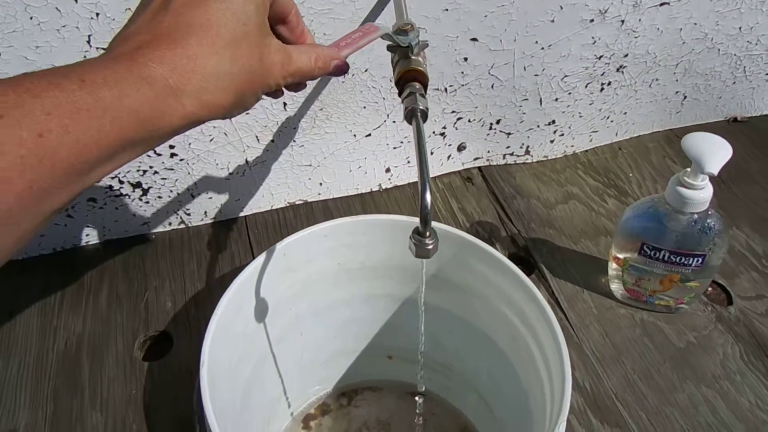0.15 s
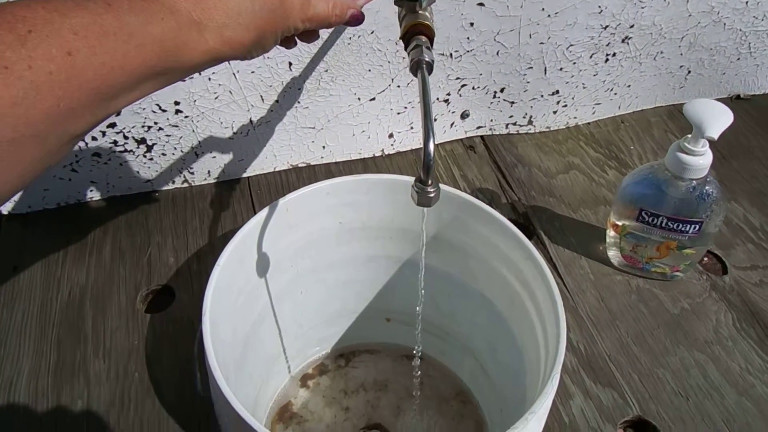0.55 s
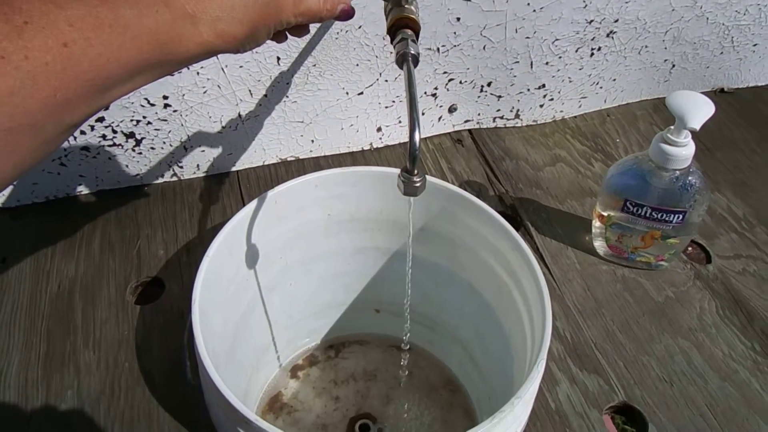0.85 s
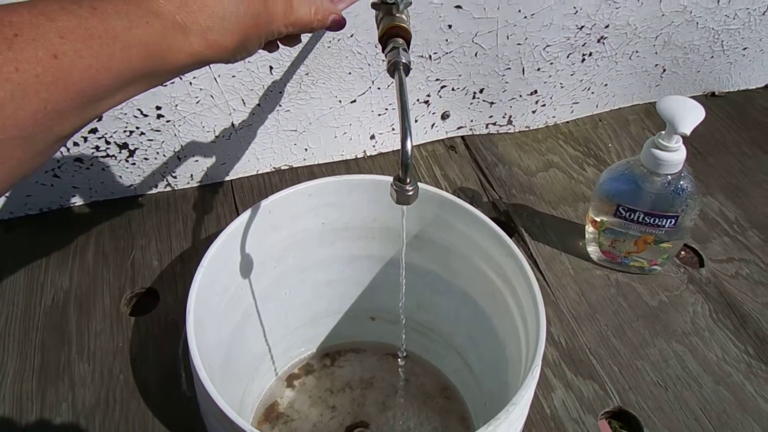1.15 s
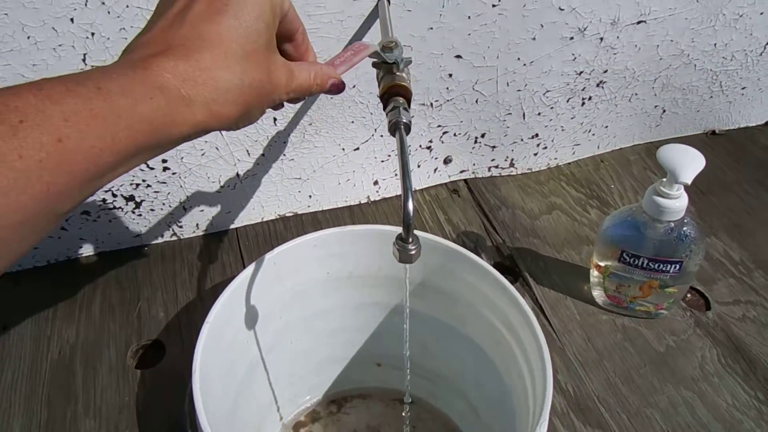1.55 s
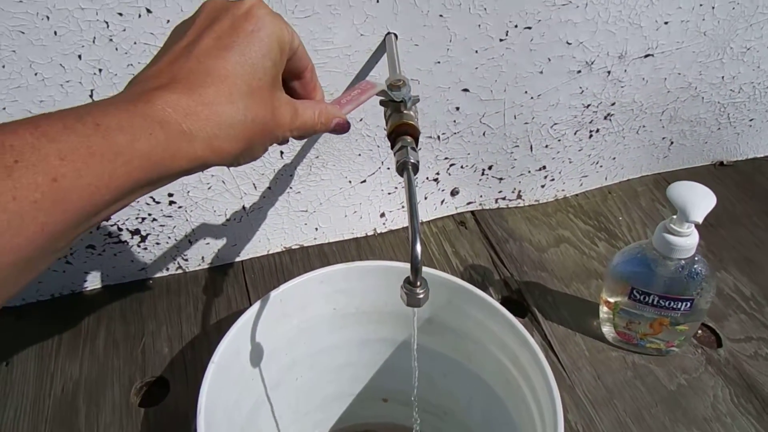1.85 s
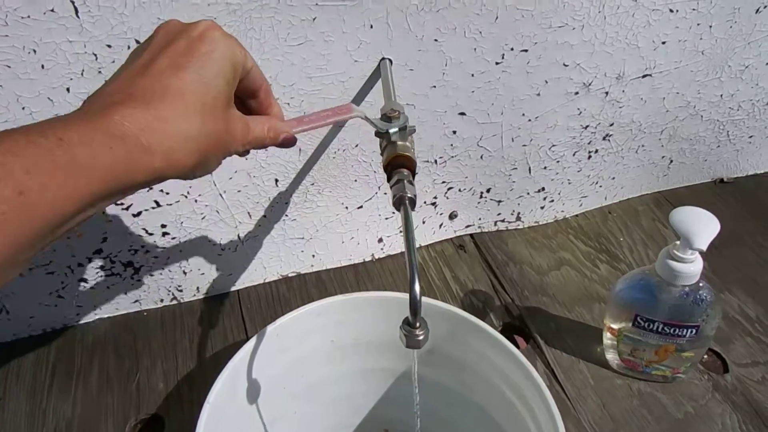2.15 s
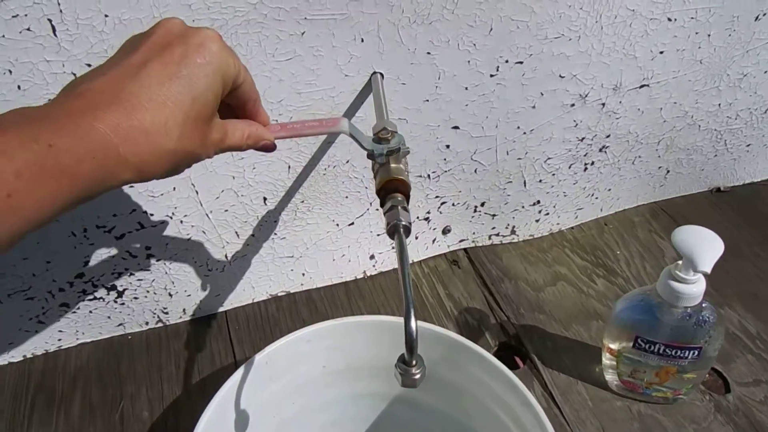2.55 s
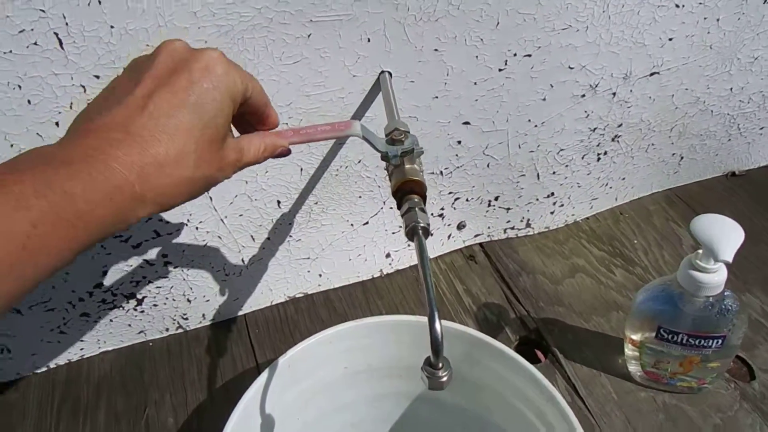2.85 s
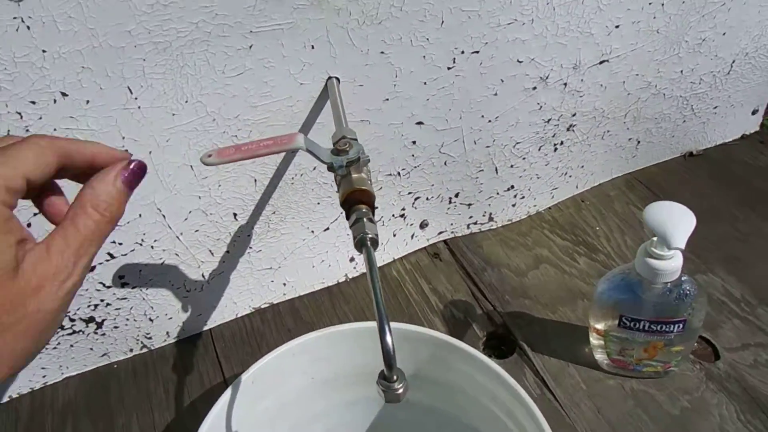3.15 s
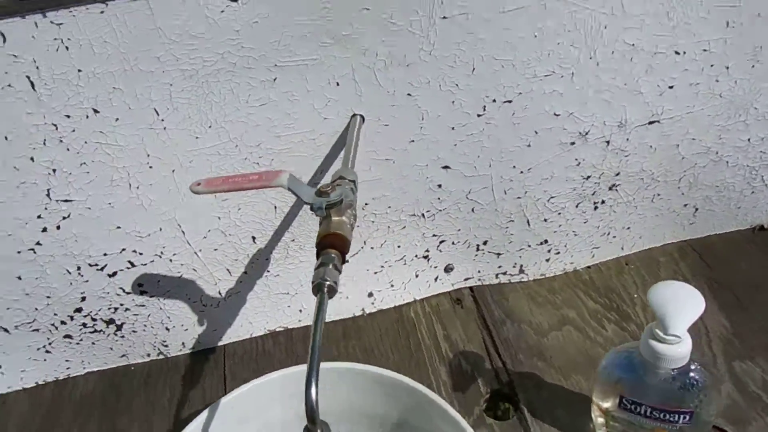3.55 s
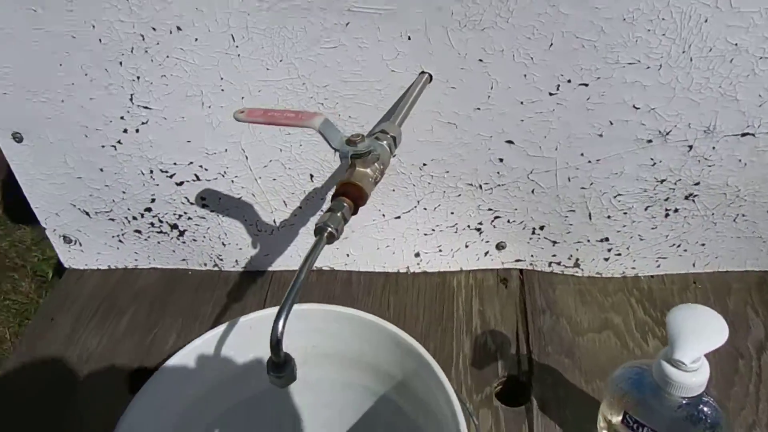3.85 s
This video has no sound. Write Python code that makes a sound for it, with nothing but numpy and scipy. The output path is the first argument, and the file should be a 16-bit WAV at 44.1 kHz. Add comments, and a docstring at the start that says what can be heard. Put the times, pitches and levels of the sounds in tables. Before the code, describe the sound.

Water trickles and plinks into a nearly empty bucket outdoors until it is shut off.

```python
"""Water patters and plinks as a thin stream falls from a spout into a nearly empty plastic bucket.
Drops slap the wet bottom, burst into spray and trap bubbles, which ring in the bucket's resonances.
The valve is shut and the last drops land at about 2.5 s.
Faint ticks and soft handling bumps remain over a steady wash of outdoor air."""
import sys
import numpy as np
from scipy import signal
from scipy.fft import rfft, irfft
from scipy.io import wavfile

SR = 44100
rng = np.random.default_rng(int(sys.argv[2]) if len(sys.argv) > 2 else 0)


def wrap_up_sound(samples):
    """Save the sound to the file named by the first command line argument, as 16-bit audio."""
    columns = np.atleast_2d(samples).T
    # keep every value between -1 and 1, then stretch to whole-number steps
    tamed = np.clip(columns, -1, 1)
    steps = np.round(tamed * 32767).astype(np.int16)
    wavfile.write(sys.argv[1], SR, steps)


N = 176400
T = np.arange(N) / SR
HZ = np.fft.rfftfreq(2 * N, 1 / SR)


def amp(db):
    """Decibels to gain."""
    return 10 ** (np.asarray(db) / 20)


def unit_rms(x):
    """Scales to unit rms."""
    return x / np.sqrt(np.mean(x ** 2) + 1e-20)


def curve(points):
    """Spreads (Hz, value) points over all frequencies."""
    hz, value = np.transpose(points)
    return np.interp(np.log(HZ + 1), np.log(hz), value)


def peaks(rows):
    """EQ curve in dB from (Hz, width, dB) peaks or dips."""
    return sum(db / (1 + (2 * (HZ - hz) / width) ** 2) for hz, width, db in rows)


def causal(db):
    """Response with this dB curve that rings only after it is struck."""
    log_gain = np.log(amp(np.r_[db, db[-2:0:-1]]))
    return np.exp(np.conj(signal.hilbert(log_gain))[:len(HZ)])


def filtered(x, response):
    """Filters by a frequency response."""
    return irfft(rfft(x, 2 * N) * response)[..., :N]


def add(mix, s, sound):
    """Mixes a sound in at time s."""
    part = mix[max(round(s * SR), 0):][:len(sound)]
    part += sound[:len(part)]


def wander(rate_hz):
    """Unit random drift up to a rate."""
    return unit_rms(filtered(rng.standard_normal(N), 1 / (1 + (HZ / rate_hz) ** 4)))


def fade(t, rise_s, t60_s):
    """Linear attack, exponential decay."""
    return np.minimum(t / rise_s, 1) * amp(-60 * np.maximum(t - rise_s, 0) / t60_s)


def rings(rows, rise_s, t60_s, glide_per_s=0):
    """Plays (s, dB, Hz) rows as dying tones; the glide is a fraction of the starting pitch."""
    t, out = T[:SR // 8], np.zeros(N)
    for s, db, hz in rows:
        tone = np.sin(2 * np.pi * hz * (t + glide_per_s * t ** 2 / 2))
        add(out, s, amp(db) * fade(t, rise_s, t60_s) * tone)
    return out


def bursts(rows, rise_s, t60_s, width_hz):
    """Plays (s, dB, Hz) rows as dying puffs of noise around each pitch."""
    envelope, out = fade(T[:SR // 8], rise_s, t60_s), np.zeros(N)
    for s, db, hz in rows:
        band = signal.iirpeak(hz, hz / width_hz, fs=SR)
        puff = envelope * signal.lfilter(*band, rng.standard_normal(len(envelope)))
        add(out, s, amp(db) / 2 * puff * np.linalg.norm(envelope) / np.linalg.norm(puff))
    return out


def stereo(direct, diffuse, likeness, balance, left_lead=0):
    """Direct sound in the middle, diffuse sound in the sides, panned by frequency."""
    alike, tilt = np.clip(curve(likeness), -1, 1), amp(curve(balance))
    mid = filtered(direct, np.sqrt(1 + alike))
    side = filtered(diffuse, np.sqrt(1 - alike))
    pan = np.array([tilt * np.exp(1j * left_lead), np.ones(len(HZ))]) / np.sqrt(1 + tilt ** 2)
    return filtered(np.array([mid + side, mid - side]), pan)


# tone of the outdoor bed: (frequency [Hz], level [dB])
AIR_TONE = [(25, -24), (70, -11), (140, 2), (270, -3), (350, 3), (500, -4.5), (950, -3.5), (1550, -4),
            (2200, -13), (3000, -14), (4500, -14.5), (5400, -29), (7000, -22), (8400, -20), (10500, -22.5),
            (16000, -22.5)]
# its width: (frequency [Hz], left-right likeness [-1..1])
AIR_LIKENESS = [(50, 0.64), (350, 0.91), (1500, 0.67), (2300, -0.042), (6000, -0.019), (9000, -0.33),
                (12000, 0)]
# its pan: (frequency [Hz], left over right [dB])
AIR_BALANCE = [(100, -2.5), (450, -0.5), (1400, -5), (1800, -9), (4400, -10), (4900, -8), (5600, -14),
               (6800, 2), (7900, -6), (11000, 0)]
def air():
    """Outdoor air: a steady, dark wash of noise."""
    noise = filtered(rng.standard_normal((2, N)), amp(curve(AIR_TONE)))
    direct, diffuse = amp(-49.5) * unit_rms(noise)
    return stereo(direct, diffuse, AIR_LIKENESS, AIR_BALANCE)


# faint ticks after the flow stops: (time [s], level [dB])
TICKS = [(2.8937, -41.5), (2.943, -43), (2.9896, -47), (3.4012, -52), (3.4645, -45), (3.487, -49),
         (3.5494, -38), (3.5912, -45), (3.615, -38), (3.667, -41.5)]
# soft knocks: (time [s], level [dB], pitch [Hz])
BUMPS = [(.334, -49, 70), (2.462, -41, 85), (2.682, -41, 149), (2.7, -41, 106), (2.722, -38.5, 131),
         (2.745, -47, 85), (3.265, -50, 100), (3.797, -44, 160)]
def handling():
    """Small dry ticks and dull handling bumps with a wide rumble, a little to the right."""
    tick_rows = [(s, db, 8100) for s, db in TICKS]
    ticks = amp(-4) * bursts(tick_rows, rise_s=.00033, t60_s=.034, width_hz=1900)
    soft = dict(rise_s=.01, t60_s=.09)
    thuds = amp(-6) * rings(BUMPS, **soft)
    rumble = amp(3) * np.array([bursts(BUMPS, **soft, width_hz=45) for _ in range(2)])
    return (ticks + thuds + rumble) * amp([[-2], [2]])


# surges of the stream: (time [s], level [dB])
SURGES = [(.247, -40), (.282, -42), (.416, -34), (.755, -34.5), (.773, -32.5), (.955, -37), (.976, -34),
          (1.174, -34.5), (1.325, -35.5), (1.432, -35.5), (1.8, -36.5), (2.216, -39), (2.299, -39),
          (2.366, -32)]
def drumming():
    """The plastic bottom booms at one low pitch under each surge."""
    return amp(-3) * rings([(s, db, 371.2) for s, db in SURGES], rise_s=.0076, t60_s=.12)


# broad colour of water in the bucket: (frequency [Hz], level [dB])
SPLASH_TONE = [(30, -32), (100, -18.5), (270, -10.5), (480, -12), (720, -3), (1100, 1), (1700, -4),
               (2300, -4), (3300, -3.5), (4400, -5), (5400, -11), (6600, -7.5), (10500, -11.5),
               (13000, -16), (16000, -25)]
# the last drops: (time [s], level [dB], pitch [Hz])
DRIPS = [(2.439, -26, 1500), (2.452, -26, 3800), (2.468, -23.5, 1610), (2.478, -28, 1580),
         (2.487, -29, 1900), (2.5035, -28, 2300), (2.513, -34, 1710), (2.521, -29, 2250),
         (2.5415, -31, 2600), (2.551, -35, 800)]
def last_drips():
    """The stream breaks up and lands as dry pats."""
    pats = bursts(DRIPS, rise_s=.00062, t60_s=.04, width_hz=1150)
    return amp(2.5) * filtered(pats, causal(curve(SPLASH_TONE)))


CRACK = dict(rise_s=.0001, t60_s=.0017, width_hz=6500)
# bursting drops: (time [s], crack level [dB], ring level [dB], ring pitch [Hz])
SPITS = [(0.05, -34, -22, 7900), (0.0775, -34, -24.5, 8160), (0.1474, -23, -23, 8000),
         (0.2234, -21, -34, 8000), (0.2505, -17, -25.5, 6000), (0.2686, -24, -35, 7200),
         (0.3312, -20, -23, 8100), (0.3419, -28, -33, 6450), (0.3703, -26, -40, 8400),
         (0.4502, -16.5, -37, 7850), (0.5468, -15, -34, 8500), (0.576, -31, -24.5, 6150),
         (0.588, -32, -23.5, 6190), (0.737, -29, -22.5, 8400), (0.7444, -25, -27, 8200),
         (0.7942, -25, -36, 7200), (0.8102, -22, -36, 6200), (0.8664, -29, -21, 7800),
         (0.8944, -28, -30, 8000), (0.942, -31, -24, 8000), (0.9715, -25, -22, 7900),
         (0.9975, -43, -24, 7300), (1.0247, -35, -21, 7800), (1.0761, -24, -34, 8050),
         (1.1632, -18, -34, 7300), (1.2024, -22, -28, 8060), (1.256, -22, -25, 8200),
         (1.2757, -27, -21.5, 8100), (1.428, -30, -25.5, 7160), (1.5007, -13.5, -14.5, 7900),
         (1.544, -20, -27, 8100), (1.7188, -21, -35, 8000), (1.7996, -18.5, -39, 7300),
         (1.8353, -12.5, -15.5, 7500), (1.9312, -24.5, -31, 5940), (1.996, -20, -32, 6320),
         (2.3193, -24, -19.5, 9000), (2.3434, -27, -21, 8500), (2.3548, -17, -23.5, 8100),
         (2.468, -34, -25.5, 7060), (2.504, -36, -28.5, 8300), (2.5735, -52, -36, 6800),
         (2.6015, -50, -34, 7400)]
def spray():
    """Each drop bursts with a sharp broadband crack and a short bright ring."""
    cracks = bursts([(s, db, 11000) for s, db, _, _ in SPITS], **CRACK)
    ring_rows = [(s, db, hz) for s, _, db, hz in SPITS]
    ringing = bursts(ring_rows, rise_s=.00051, t60_s=.012, width_hz=650)
    return amp(4) * cracks + amp(2) * ringing


PLINK, BUBBLE_GLIDE_PER_S = dict(rise_s=.0005, t60_s=.021), .74
# bright bubbles: (time [s], level [dB], pitch [Hz])
PLINKS = [(0.2006, -24, 2980), (0.2413, -27, 2950), (.26, -23, 3200), (0.2918, -17, 2990),
          (0.3417, -11, 3044), (0.403, -26.5, 4460), (.576, -27, 4100), (0.598, -18, 4360),
          (.755, -32, 3500), (0.7926, -24, 2760), (0.8893, -25.5, 3080), (.9115, -24.5, 4060),
          (1.1225, -31, 3680), (1.139, -28, 3970), (1.156, -29, 3150), (1.182, -22, 3140),
          (1.2265, -22.5, 4180), (1.2752, -13.5, 3100), (1.316, -22, 2860), (1.4343, -24.5, 2600),
          (1.501, -21, 2970), (1.5148, -23.5, 3060), (1.575, -27, 2970), (1.602, -21.5, 3010),
          (1.6375, -25, 3130), (1.6846, -18.5, 2640), (1.7173, -21, 2860), (1.7736, -21, 2990),
          (1.929, -21.5, 3120), (2.0552, -24, 3080), (2.071, -21, 2880), (2.1086, -30, 3080),
          (2.2583, -23.5, 2860), (2.335, -20.5, 3050), (2.4389, -23, 2670), (2.5425, -33.5, 4000)]
def plinks():
    """Small trapped bubbles ring with a slight upward chirp and a snap of noise."""
    tones = rings(PLINKS, **PLINK, glide_per_s=BUBBLE_GLIDE_PER_S)
    snaps = bursts(PLINKS, **PLINK, width_hz=1600)
    return amp(-1.5) * tones + amp(-4.5) * snaps


# large air pockets: (time [s], level [dB], pitch [Hz])
GLUGS = [(0.017, -20, 1200), (0.256, -22, 1210), (0.315, -20.5, 1250), (0.337, -20, 1280),
         (0.608, -23, 1270), (0.64, -17.5, 1216), (0.682, -22, 887), (0.751, -20, 1225),
         (0.976, -17.5, 1230), (1.175, -15, 1180), (1.203, -15, 1235), (1.356, -16.5, 1150),
         (1.78, -20, 1216), (1.804, -18.5, 1040), (2.1, -22.5, 1200), (2.187, -26, 1280),
         (2.295, -24, 1300), (2.362, -17, 1070)]
def glugs():
    """Big bubbles ring lower and longer, also bending upward."""
    return amp(-9) * rings(GLUGS, rise_s=.0011, t60_s=.052, glide_per_s=BUBBLE_GLIDE_PER_S)


# heavy drops on the bottom: (time [s], level [dB])
SLAPS = [(0.3413, -15), (0.433, -23), (0.576, -21.5), (.671, -17.5), (0.753, -17), (1.227, -25),
         (1.276, -24), (1.5, -25.5), (1.685, -26), (1.719, -24), (1.772, -24), (1.93, -24.5), (2.053, -18),
         (2.468, -21)]
def slaps(bucket):
    """Each heavy drop is a short spatter of impacts that rings the bucket."""
    envelope, hits = fade(T[:SR // 8], rise_s=.001, t60_s=.015), np.zeros(N)
    for s, db in SLAPS:
        add(hits, s, amp(db) * envelope * rng.choice([-1, 1], len(envelope)))
    return amp(-1) / 2 * filtered(hits, bucket) / np.sqrt(np.mean(abs(bucket) ** 2))


def patter(per_s, spread_db):
    """Random impulses, mostly small with a few large ones."""
    size = amp(spread_db * np.minimum(rng.exponential(1, N), 3.2))
    return unit_rms(size * rng.choice([-1, 1], N) * (rng.random(N) < per_s / SR))


def bubble_swarm(per_s=5000, pitches=28, decay_cycles=2.82):
    """Thousands of quickly damped bubbles merge into a fizz."""
    t, swarm = T[:SR // 10], np.zeros(N)
    for hz in np.geomspace(110, 15000, pitches):
        bubble = np.sin(2 * np.pi * hz * t) * np.exp(-hz * t / decay_cycles)
        births = patter(per_s / pitches, spread_db=4.5)
        swarm += np.sqrt(hz) * unit_rms(signal.oaconvolve(births, bubble)[:N])
    return unit_rms(swarm)


SHUT_AT_S, CLOSING_S = 2.5, .07
# faders of the stream: (time [s], body level [dB], patter level [dB], spray level [dB])
FLOW = [(0.0, -4.5, -4.5, -6), (0.12, -5, -4.5, -4.5), (0.28, -1, 0, 2), (0.37, -4, -3.5, -5),
        (0.58, -2, -1.5, 0.5), (0.68, -4, -3, -6), (0.78, -1.5, -2, 1), (1.0, -2, -1.5, 0.5),
        (1.09, -2, 0.5, 0), (1.2, -1, 2, -1.5), (1.45, -2.5, -1.5, 1), (1.62, -2.5, 0, 0.5),
        (1.8, -3.5, -0.5, -3.5), (1.9, -7.5, -4, -8), (2.12, -2.5, -4, -0.5), (2.36, -0.5, -1, -2),
        (2.461, -2, -5.5, -1.5)]
# body, patter and spray bands: (frequency [Hz])
BAND_HZ = [1200, 3300, 8000]
# random flicker of each band: (depth [dB])
FLICKER_DB = [.5, 1.6, 2.6]
def stream(bucket):
    """Drop impacts and bubbles sputter together and excite the bucket until the valve shuts."""
    fizz = bubble_swarm() + amp(-4.5) * patter(per_s=600, spread_db=2.5)
    sputter = fizz * amp(1.1 * wander(rate_hz=70))
    times, *faders = np.transpose(FLOW)
    drive = np.zeros(N)
    for db, flicker_db, solo in zip(faders, FLICKER_DB, np.eye(len(faders))):
        gain = amp(np.interp(T, times, db) + flicker_db * wander(rate_hz=90))
        band = curve(list(zip(BAND_HZ, solo)))
        drive += filtered(sputter * gain, band)
    valve = np.clip((SHUT_AT_S - T) / CLOSING_S, 0, 1)
    return amp(-37.5) * unit_rms(filtered(drive * valve, bucket))


def strays(count, low_hz, high_hz, range_db=12):
    """Random (s, dB, Hz) rows whose level follows the stream's patter."""
    when, softness, pitch = rng.random((count, 3)).T
    times, _, patter_db, _ = np.transpose(FLOW)
    s = when * (SHUT_AT_S - CLOSING_S)
    db = np.interp(s, times, patter_db) - range_db * softness
    return zip(s, db, low_hz * (high_hz / low_hz) ** pitch)


def scatter():
    """The stream throws off quieter bubbles and crackling flecks of spray."""
    bubbles = rings(strays(45, low_hz=2040, high_hz=4830), **PLINK, glide_per_s=BUBBLE_GLIDE_PER_S)
    flecks = bursts(strays(110, low_hz=6000, high_hz=13500), **CRACK)
    return amp(-27) * bubbles + amp(-22.5) * flecks


def echoes(x, t60_s, count=24, changes=100):
    """Dense reflections that keep shifting as the water moves: random crossfades of noise tails."""
    t = T[:SR // 8]
    tails = rng.standard_normal((count, len(t))) * amp(-60 * t / t60_s) * (t > .001)
    times = np.linspace(0, T[-1], changes)
    sends = np.array([np.interp(T, times, w) for w in rng.standard_normal((count, changes))])
    feeds = x * sends / np.linalg.norm(sends, axis=0)
    return signal.oaconvolve(feeds, tails / np.linalg.norm(tails[0]), axes=1).sum(0)[:N]


# resonances of the bucket: (frequency [Hz], width [Hz], boost [dB])
BUCKET_MODES = [(153, 29, 14.5), (361.4, 59.5, 18.5), (415.4, 17.4, 13), (598, 68, 10), (677, 17, 4.5),
                (905, 89, 9), (1073, 23, 3), (1254, 116, 10), (1546, 67, 4), (1955, 46, 4), (2651, 43, 9.5),
                (2967, 365, 9), (4087, 116, 7.5), (4540, 170, 6.5), (8160, 720, 5.5)]
# width of the water: (frequency [Hz], left-right likeness [-1..1])
WATER_LIKENESS = [(50, .3), (150, .8), (350, .98), (1300, .97), (3000, .85), (8000, .72), (15000, .5)]
# its pan: (frequency [Hz], left over right [dB])
WATER_BALANCE = [(100, 0.5), (1300, -1), (2000, -5.5), (2900, -3), (3250, -4), (3600, -3.5), (4500, -8),
                 (4900, 10), (5900, -9.5), (6800, 5), (7900, -11.5), (9500, 2), (11500, 8), (16000, 1.5)]
# its phase offset: (frequency [Hz], left lead [rad])
WATER_LEAD = [(100, 0), (1400, 0), (3000, .8), (6500, 1.3), (9500, 3.1), (11500, 3), (16000, 2.5)]
def water(wall_t60_s=.014, yard_t60_s=.12):
    """All the water layers, reflected by the bucket walls and faintly by the yard."""
    bucket = causal(curve(SPLASH_TONE) + peaks(BUCKET_MODES))
    pour = stream(bucket) + slaps(bucket) + scatter() + glugs() + plinks()
    pour += spray() + drumming() + last_drips()
    wet = pour + amp(-7) * echoes(pour, wall_t60_s) + amp(-27) * echoes(pour, yard_t60_s)
    return stereo(wet, echoes(wet, wall_t60_s), WATER_LIKENESS, WATER_BALANCE, curve(WATER_LEAD))


def scene():
    """Water in front, handling and air behind."""
    return water() + handling() + air()


# narrow cuts on the whole mix: (frequency [Hz], width [Hz], gain [dB])
NOTCHES = [(2496, 82, -18.5), (5010, 185, -12), (7470, 180, -8)]
def record(dry):
    """Master EQ: three treble notches, then a steep low-pass."""
    notched = filtered(dry, causal(peaks(NOTCHES)))
    low_pass = signal.firwin(511, 16050, window=("kaiser", 9), fs=SR)
    return signal.oaconvolve(notched, low_pass[None], "same")


dry = scene()
out = record(dry)
wrap_up_sound(out)
```